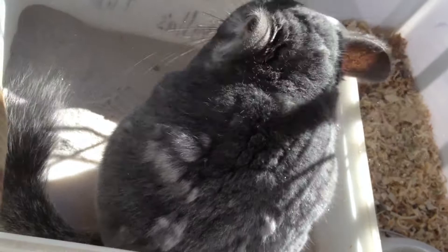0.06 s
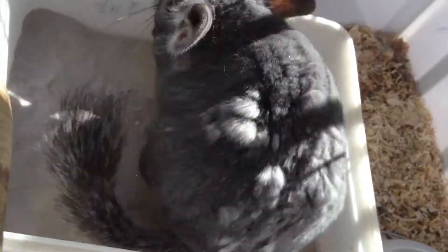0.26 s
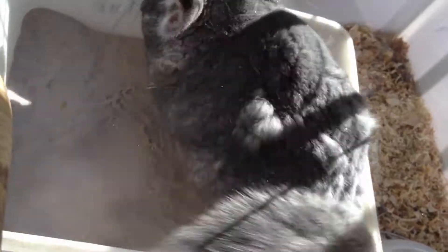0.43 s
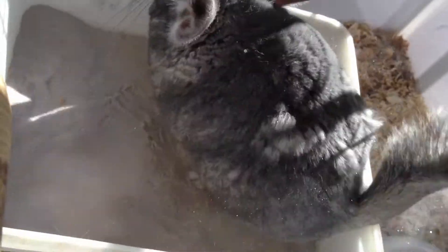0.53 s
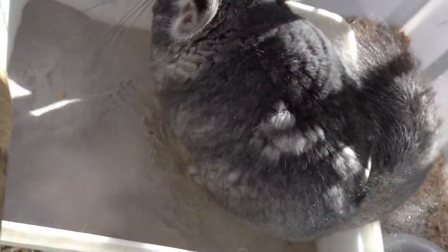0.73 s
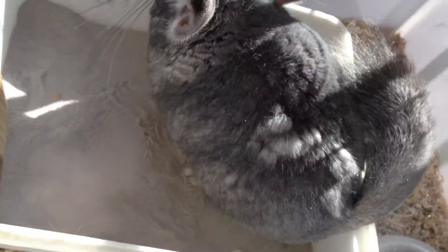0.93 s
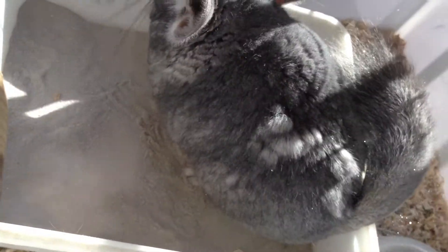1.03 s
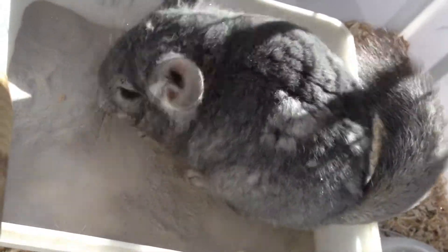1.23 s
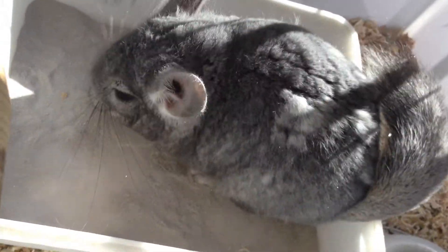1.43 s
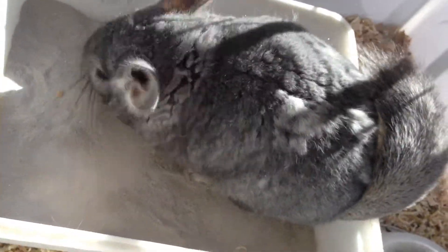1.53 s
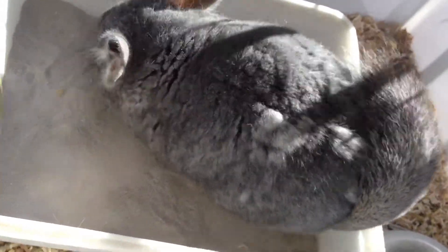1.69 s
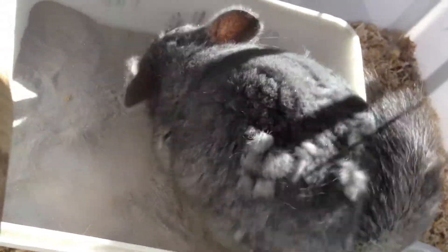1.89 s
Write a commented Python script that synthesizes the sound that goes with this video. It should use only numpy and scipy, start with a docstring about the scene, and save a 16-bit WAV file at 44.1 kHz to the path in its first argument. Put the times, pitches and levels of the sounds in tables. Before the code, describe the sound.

A chinchilla turns in its dust bath, knocking the plastic tub once, then pattering and rubbing with small gritty ticks. Near the end grit snaps and the dust swishes. Nearby walls echo slightly over a low background rumble.

```python
"""Over a low rumble, fur and paws hiss through bathing dust as a chinchilla turns, rubbing its plastic tub.
Claws and grit tick on the rim. One sharp knock rings the tub, then soft paw steps thump on its floor.
A faint thin whistle falls in the middle; late on, grit snaps once and a stronger sweep of dust begins.
Nearby walls answer the knock, steps, ticks and snap."""
import sys
import numpy as np
from scipy import signal
from scipy.fft import rfft, irfft, next_fast_len
from scipy.io import wavfile

SR = 44100
rng = np.random.default_rng(int(sys.argv[2]) if len(sys.argv) > 2 else 0)


def waveform_to_disk(signal):
    """Save audio, clipped to [-1, 1], as 16-bit WAV at the path in sys.argv[1]."""
    frames = np.transpose(np.atleast_2d(signal))
    scaled = np.clip(frames, -1, 1) * 32767
    samples = np.round(scaled).astype(np.int16)
    wavfile.write(sys.argv[1], SR, samples)


N = 85995
TIME_S = np.arange(N) / SR


def amp(db):
    """Decibels to gain."""
    return 10 ** (np.asarray(db) / 20)

def unit(x):
    """Scale to rms 1."""
    return x / np.sqrt(np.mean(x ** 2) + 1e-20)

def along(points, hz):
    """Interpolate (Hz, value) points on a log frequency axis."""
    f, values = np.transpose(points)
    return np.interp(np.log(hz + 1), np.log(f + 1), values)

def curves(rows):
    """Per-sample curve for each column after time."""
    s, *columns = np.transpose(rows)
    return [np.interp(TIME_S, s, column) for column in columns]

def filtered(x, response):
    """Apply a zero-phase gain, response(hz)."""
    size = next_fast_len(N + SR // 2)
    return irfft(rfft(x, size) * response(np.fft.rfftfreq(size, 1 / SR)), size)[:N]

def coloured(x, colour):
    """Shape x by (Hz, dB) points; rms 1."""
    return unit(filtered(x, lambda hz: amp(along(colour, hz))))

def noise():
    """White noise."""
    return rng.standard_normal(N)

def delayed(x, s):
    """Delay x by s seconds."""
    return np.pad(x, (round(s * SR), 0))[:N]

def rise(attack_s):
    """Exponential onset."""
    return 1 - np.exp(-TIME_S / attack_s)

def fade(t60_s):
    """Decay of 60 dB per t60_s."""
    return np.exp(-np.log(1000) * TIME_S / t60_s)

def ring(modes, scatter_db=0):
    """Damped sines with optional random level scatter."""
    return sum(amp(db + scatter_db * rng.standard_normal()) * fade(t60) * np.sin(2 * np.pi * hz * TIME_S)
               for hz, db, t60 in modes)


# Background spectrum (frequency [Hz], level [dB])
RUMBLE_COLOUR = [(25, 0.5), (60, -7), (95, -1.5), (146, -4), (237, -1), (290, -9), (450, -10), (640, -17),
                 (850, -14), (1280, -18.5), (2000, -25.5), (3000, -30), (6000, -37.5), (10500, -48),
                 (15000, -35)]

def rumble(level_db=-61.5):
    """Steady low background noise."""
    return amp(level_db) * coloured(noise(), RUMBLE_COLOUR)


def grit(grains_per_s=2500, grain_db=-6):
    """White hiss plus tiny grains of uneven size."""
    grains = (rng.random(N) < grains_per_s / SR) * noise()
    return noise() + amp(grain_db) * unit(grains)


# Dust hiss envelope (time [s], level [dB])
BRUSH_LEVEL = [(0, -74), (.042, -63), (.1, -62.5), (.146, -59.5), (.172, -70.5), (.25, -68), (.295, -56.5),
               (.345, -62.5), (.372, -57), (.41, -62.5), (.45, -70), (.475, -57.5), (.5, -69), (.53, -65),
               (.56, -77), (.77, -75), (.85, -75), (1.12, -76), (1.188, -65.5), (1.22, -86), (1.29, -64),
               (1.33, -98), (1.55, -89), (1.7, -64), (1.735, -62.5), (1.8, -64), (1.846, -66.5),
               (1.95, -46)]
# Dust hiss spectrum (frequency [Hz], level [dB])
BRUSH_COLOUR = [(500, 2.5), (1500, -7), (2500, -7.5), (4500, -7.5), (5400, -11), (7000, -2.5), (8400, 1),
                (9200, 1), (10200, -6.5), (13000, -7), (15400, -6)]

def brush():
    """Dust hisses under fur and paws."""
    return amp(curves(BRUSH_LEVEL)[0]) * coloured(grit(), BRUSH_COLOUR)


# Body friction envelope (time [s], level [dB])
RUB_LEVEL = [(0, -62.5), (.2, -68.5), (.35, -48.5), (.45, -57), (.62, -61.5), (.7, -56.5), (.76, -62.5),
             (.84, -52), (.92, -62.5), (.99, -64.5), (1.03, -54.5), (1.09, -57), (1.13, -73), (1.6, -68),
             (1.8, -67.5), (1.95, -79)]
# Body friction spectrum (frequency [Hz], level [dB])
RUB_COLOUR = [(40, -48), (90, -1), (135, 10), (200, -5.5), (280, -2.5), (370, -1), (510, 0.5), (700, -8.5),
              (1000, -11.5), (1400, -22.5), (2500, -26), (6000, -44)]

def rub():
    """The body rubs the tub: low friction noise."""
    return amp(curves(RUB_LEVEL)[0]) * coloured(grit(), RUB_COLOUR)


# Rim contacts (time [s], level [dB], t60 [s], relative ring level [dB])
TICKS = [(.099, -49.5, 0.027, -33), (0.316, -46.5, 0.041, -40), (0.374, -44.5, 0.038, -38),
         (0.38, -60, 0.036, -35), (.464, -53, 0.049, -32), (0.694, -60, .012, -35),
         (0.802, -45, 0.017, -19), (0.8535, -42, 0.021, -20), (0.8865, -44.5, 0.031, -19),
         (0.899, -50, 0.019, -28), (1.2447, -46, .025, -40), (1.285, -58, 0.028, -33),
         (1.624, -59, 0.025, -40), (1.684, -57, .012, -35)]
# Scratch spectrum (frequency [Hz], level [dB])
TICK_COLOUR = [(800, 9), (1700, 5), (3000, -7), (5300, -5.5), (6800, 5), (8000, 0), (9200, 6.5),
               (10500, -4.5), (14500, -1)]
# High ring (frequency [Hz], level [dB], t60 [s])
TICK_MODES = [(8200, -7, 0.23), (9350, -5.5, 0.17), (8860, 2.5, 0.084), (10900, -26, 0.19)]

def ticks(attack_s=0.0015, room_db=-4):
    """Claws and grit tick on the rim: short scratches with a faint high ring."""
    direct = np.zeros(N)
    for s, db, t60, ring_db in TICKS:
        scratch = coloured(grit(), TICK_COLOUR) * fade(t60)
        ringing = amp(ring_db) * ring(TICK_MODES, scatter_db=3)
        direct += amp(db) * delayed(rise(attack_s) * (scratch + ringing), s)
    return direct + amp(room_db) * room(direct)


# Reverb decay (frequency [Hz], t60 [s])
ROOM_T60 = [(130, 0.77), (500, 0.36), (1200, 0.26), (4000, 0.26), (12000, 0.16)]
# Reverb spectrum (frequency [Hz], gain [dB])
ROOM_COLOUR = [(60, -27), (130, -1), (250, -6.5), (500, -3), (900, -7), (1500, -11), (5000, -27)]

def room(x, build_s=0.005):
    """Diffuse reflections of x; treble dies first."""
    hz, s, spectra = signal.stft(rng.standard_normal(SR), SR, nperseg=256)
    decay = np.exp(-np.log(1000) * s / along(ROOM_T60, hz)[:, None])
    tail = signal.istft(spectra * decay, SR, nperseg=256)[1]
    tail *= rise(build_s)[:len(tail)]
    wet = signal.fftconvolve(x, tail / np.linalg.norm(tail))[:N]
    return filtered(wet, lambda f: amp(along(ROOM_COLOUR, f)))


# Struck wall's dead thud (frequency [Hz], level [dB], t60 [s])
THUD_MODES = [(335, -22, 0.098), (506, -18.5, 0.073), (593, 1.5, 0.0087), (926, -14.5, 0.0071),
              (1460, -30, 0.024)]
# Tub's hollow ring (frequency [Hz], level [dB], t60 [s])
TUB_MODES = [(139, -32, .55), (236, -33, .65), (362, -34, .5), (420, -32, .9), (509, -28, .42),
             (584, -30, .35), (645, -27, .12), (890, -42, .5), (1332, -54, .3)]
# Tub floor's boom (frequency [Hz], level [dB], t60 [s])
BOOM_MODES = [(152.6, -2, 0.061)]
# Early echoes off nearby walls (delay [s], gain [ratio])
WALL_ECHOES = [(.0069, -0.16), (.0086, -0.042), (0.0124, 0.046), (0.0209, 0.037)]

def knock(start_s=0.2299, gain_db=-11.5, radiate_hz=230, contact_hz=9500, echo_hz=1300, room_db=-7.5):
    """A blow on the tub: dead thud and crack, dull echoes, hollow ring, slower floor boom."""
    crack = amp(-55) * fade(t60_s=0.0014)
    blow = delayed(ring(THUD_MODES) + crack, start_s)
    radiated = signal.sosfilt(signal.butter(1, radiate_hz, "highpass", fs=SR, output="sos"), blow)
    thud = filtered(radiated, lambda hz: 1 / np.sqrt(1 + (hz / contact_hz) ** 6))
    dull = filtered(thud, lambda hz: 1 / (1 + (hz / echo_hz) ** 6))
    echoes = sum(gain * delayed(dull, s) for s, gain in WALL_ECHOES)
    boom = ring(BOOM_MODES) * rise(attack_s=0.014)
    hollow = ring(TUB_MODES) * rise(attack_s=0.001)
    body = delayed(boom + hollow, start_s)
    return -amp(gain_db) * (thud + echoes + body + amp(room_db) * room(thud))


# Paw landings (time [s], level [dB], pitch [Hz], t60 [s], relative claw tap level [dB])
STEPS = [(.322, -39.5, 413, 0.019, -13), (.381, -47.5, 699, 0.094, -14), (.4635, -38.5, 770, 0.019, -3.5),
         (.494, -44, 414, 0.044, -15.5), (.530, -37, 225, 0.0215, -31), (0.683, -45, 441, 0.038, -11),
         (0.6984, -43, 513, 0.0081, -0.5), (0.805, -46, 520, 0.032, -15), (0.826, -44.5, 498, 0.069, -19),
         (0.8546, -38.5, 620, 0.019, -7), (0.861, -35, 358, 0.035, -27), (0.891, -57, 340, 0.016, -13),
         (.898, -44.5, 514.5, 0.13, -9), (1.014, -40.5, 380, 0.021, -9), (1.027, -49, 155, 0.055, -9),
         (1.067, -46, 456, .03, -11), (1.095, -36, 332, 0.019, -15), (1.246, -48.5, 594, 0.034, -14),
         (1.284, -46, 610, 0.015, -12), (1.501, -50, 418, 0.036, -13), (1.689, -53.5, 607, 0.062, -20),
         (1.788, -40.5, 236, 0.052, -23)]
# Claw tap spectrum (frequency [Hz], level [dB])
TAP_COLOUR = [(150, -13), (500, 5), (900, -2), (1300, -12.5), (1700, -10), (3000, -22.5), (6000, -38)]

def steps(attack_s=0.00086, click_db=-20.5, ring_db=-2.5, room_db=-5.5):
    """Each paw lands with a soft thump and a claw tap, and rings the tub a little."""
    thumps, rings = np.zeros(N), np.zeros(N)
    for s, db, hz, t60, tap_db in STEPS:
        tap = amp(tap_db) * fade(t60_s=0.026) * coloured(noise(), TAP_COLOUR)
        paw = rise(attack_s) * (ring([(hz, 0, t60)]) + tap)
        click = amp(click_db) * ring(THUD_MODES)
        thumps -= amp(db) * delayed(paw + click, s)
        rings -= amp(db + ring_db) * delayed(ring(TUB_MODES, scatter_db=4), s)
    return thumps + rings + amp(room_db) * room(thumps)


# Whistle glide (time [s], pitch [Hz], level [dB])
WHISTLE_GLIDE = [(.9, 8850, -90), (.932, 8700, -73), (.945, 8500, -63), (.961, 8220, -68),
                 (.969, 8180, -79), (.978, 8230, -64), (1.0, 8080, -73), (1.015, 8000, -90),
                 (1.06, 8000, -110)]
# Undertone envelope (time [s], level [dB])
UNDERTONE_LEVEL = [(.88, -76.5), (.915, -73), (.94, -77.5), (.965, -79), (.99, -73), (1.02, -79),
                   (1.05, -97)]

def whistle(undertone_hz=4430, width_hz=150):
    """A faint falling sine over a lower, narrow band of noise."""
    hz, db = curves(WHISTLE_GLIDE)
    tone = amp(db) * np.sin(2 * np.pi * np.cumsum(hz) / SR)
    band = unit(filtered(noise(), lambda f: np.exp(-0.5 * ((f - undertone_hz) / width_hz) ** 2)))
    undertone = amp(curves(UNDERTONE_LEVEL)[0]) * band
    gate = (TIME_S > UNDERTONE_LEVEL[0][0]) & (TIME_S < WHISTLE_GLIDE[-1][0])
    return gate * (tone + undertone)


# Grit snap (frequency [Hz], level [dB], t60 [s])
SNAP_MODES = [(2100, -10, .025), (3520, -5, .022), (4480, -8, .027), (6870, -9, .02), (8490, 0, .02),
              (8980, -9, .02), (11400, -8, .012), (13990, -15, .022)]

def snap(start_s=1.712, gain_db=-47, roughness=0.55, room_db=-4):
    """One bright snap of grit with a fluttering ring."""
    flutter = 1 + roughness * coloured(noise(), [(600, -9), (2000, -27)])
    direct = amp(gain_db) * delayed(ring(SNAP_MODES) * flutter, start_s)
    return direct + amp(room_db) * room(direct)


# Sweep envelope (time [s], level [dB])
SWEEP_LEVEL = [(1.84, -67.5), (1.872, -59.5), (1.9, -52.5), (1.917, -56.5), (1.935, -54.5), (1.95, -49)]
# Sweep spectrum (frequency [Hz], level [dB])
SWEEP_COLOUR = [(200, -11), (420, -5), (640, 3), (930, 1), (1300, -13.5), (2300, -18), (5300, -15.5),
                (7200, -14.5), (9200, -17), (10500, -20.5), (13000, -20), (15400, -16)]

def sweep():
    """A sweep through the dust: faint gritty noise that swells at the end."""
    return amp(curves(SWEEP_LEVEL)[0]) * coloured(grit(), SWEEP_COLOUR)


def scene(flutter_db=2):
    """The animal in its tub over the rumble; uneven contact flutters all friction layers together."""
    contact = amp(flutter_db * coloured(noise(), [(60, -9), (200, -15), (800, -102)]))
    friction = contact * (brush() + rub() + sweep())
    return (rumble() + friction + ticks() + knock() + steps() + whistle() + snap())[None]


def record(dry, low_cut_hz=100, top_hz=15400):
    """The microphone drops deep bass and everything above its band limit."""
    thin = signal.sosfilt(signal.butter(4, low_cut_hz, "highpass", fs=SR, output="sos"), dry[0])
    return filtered(thin, lambda hz: hz < top_hz)[None]


dry = scene()
out = record(dry)
waveform_to_disk(out)
```